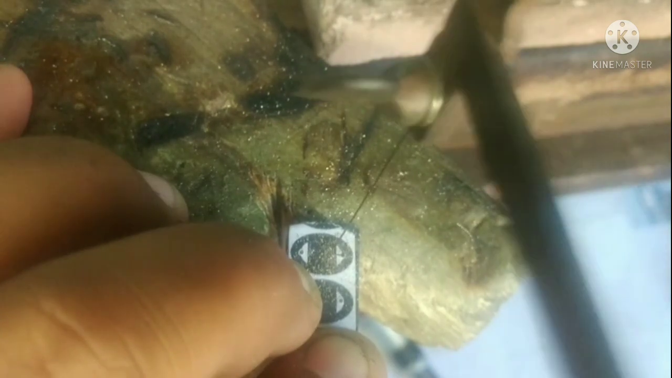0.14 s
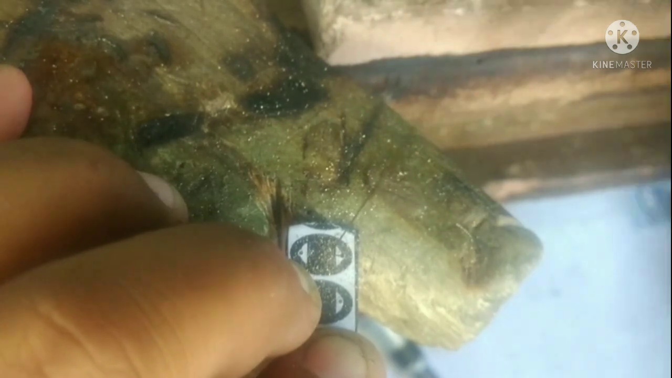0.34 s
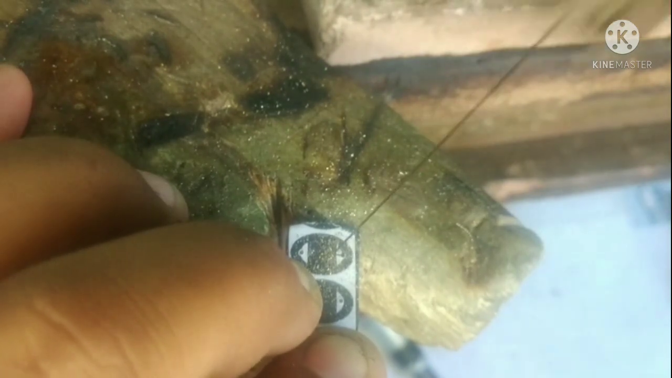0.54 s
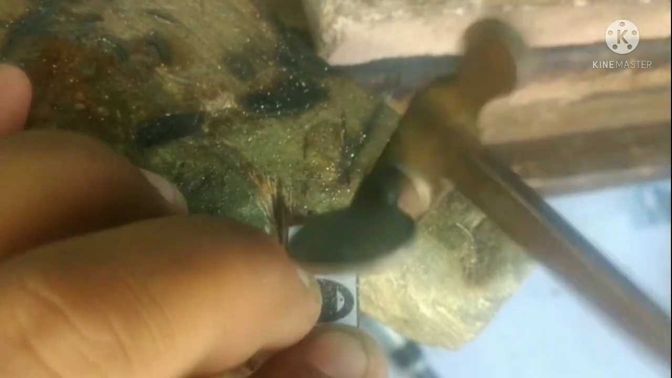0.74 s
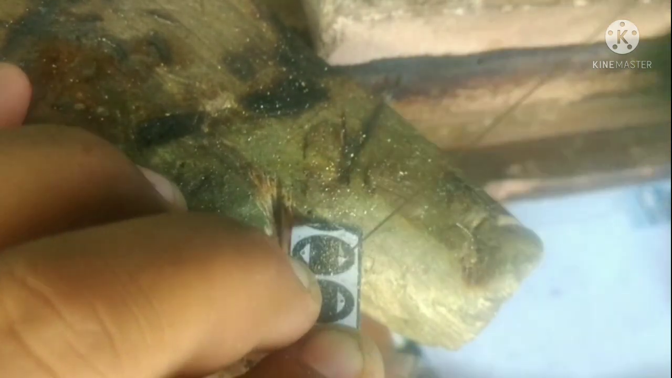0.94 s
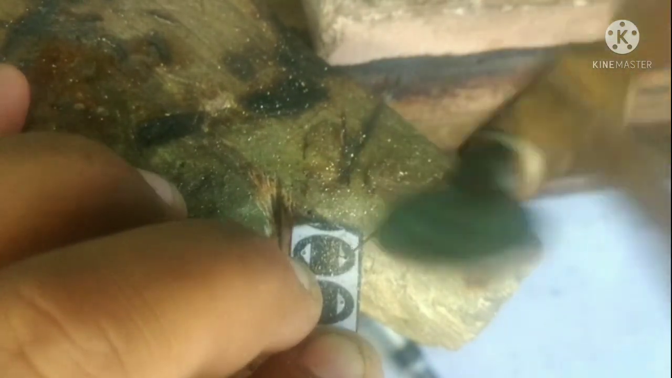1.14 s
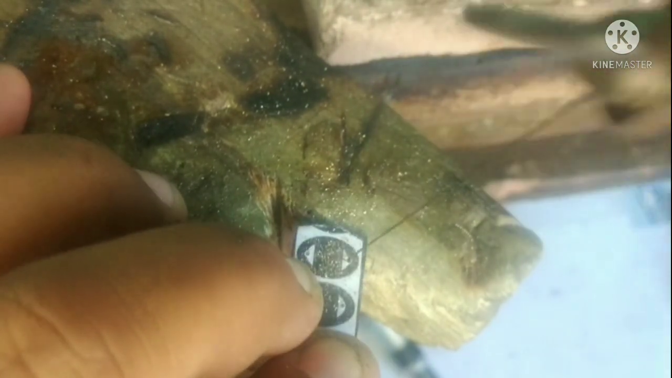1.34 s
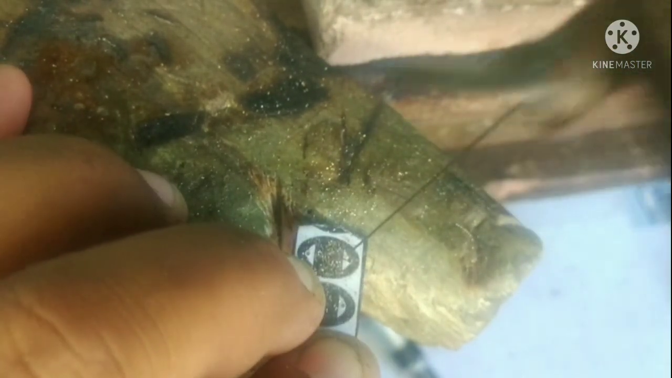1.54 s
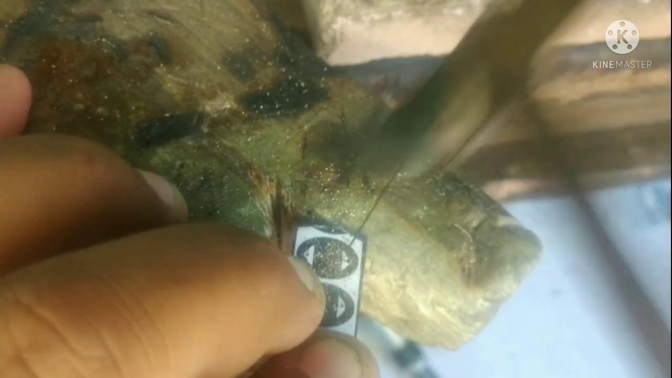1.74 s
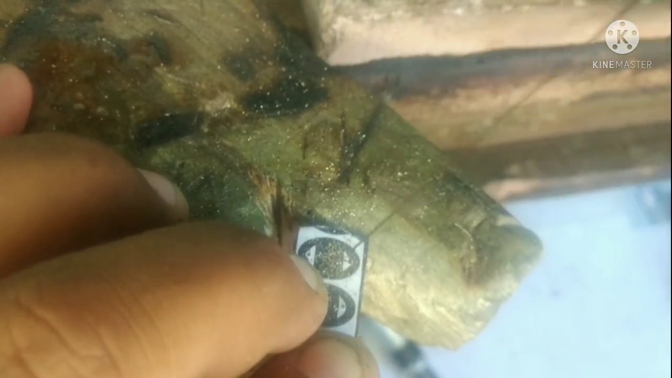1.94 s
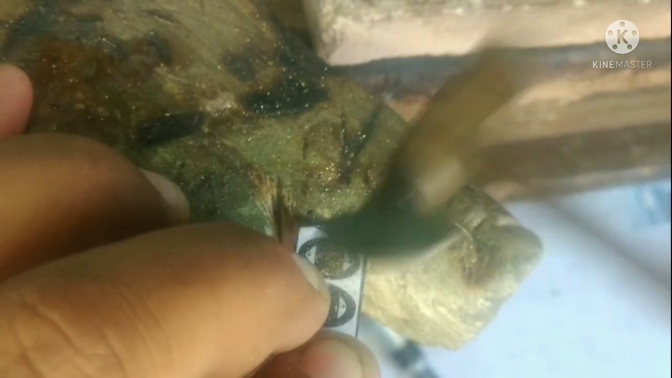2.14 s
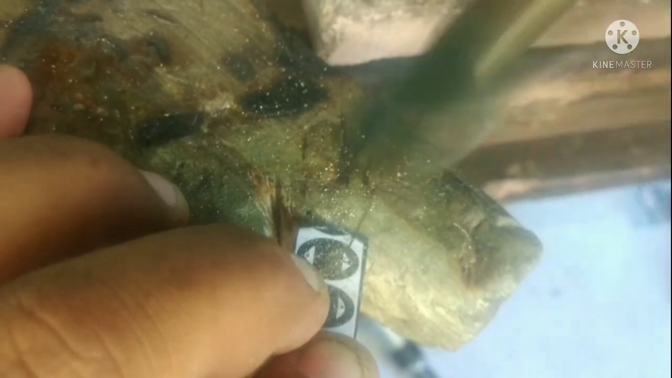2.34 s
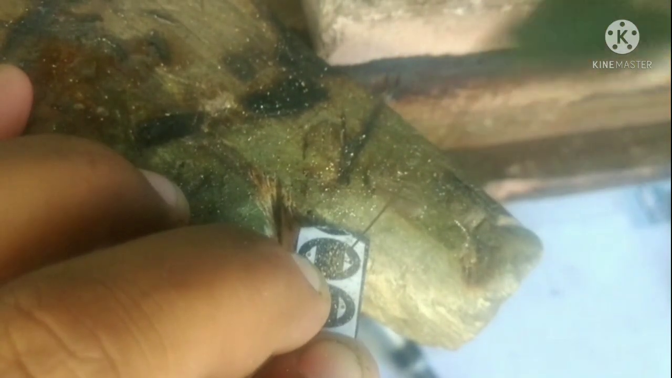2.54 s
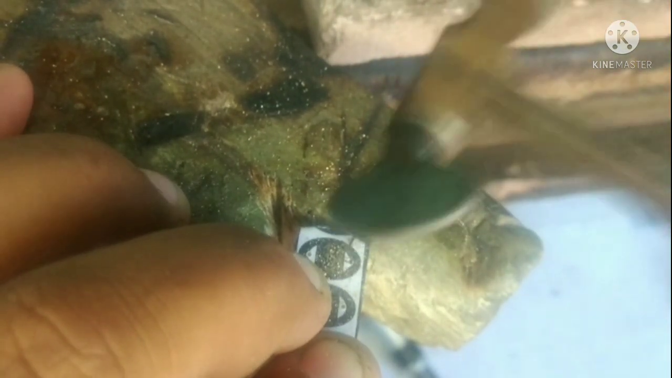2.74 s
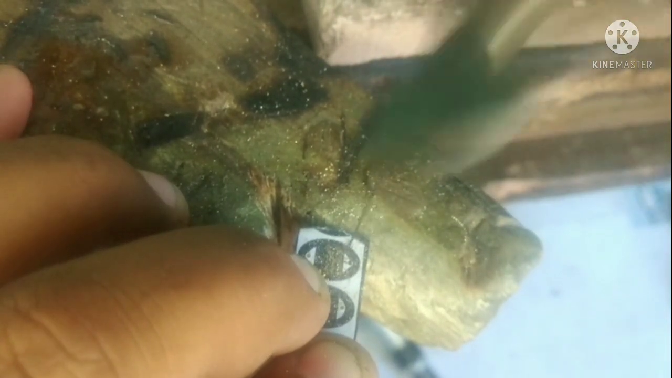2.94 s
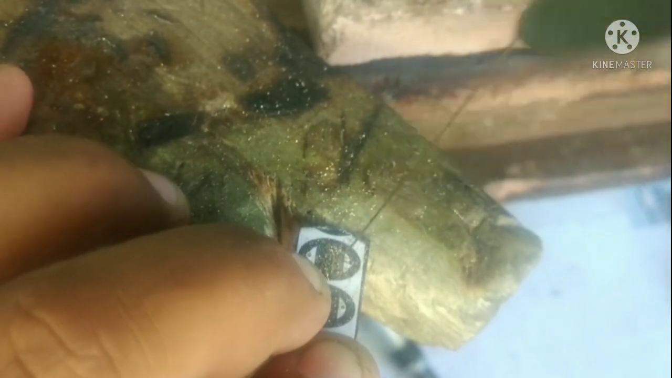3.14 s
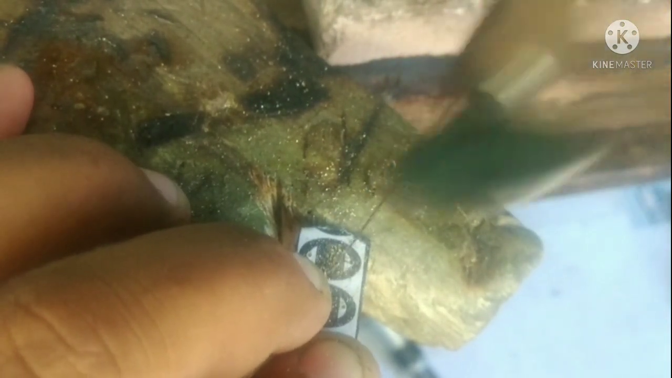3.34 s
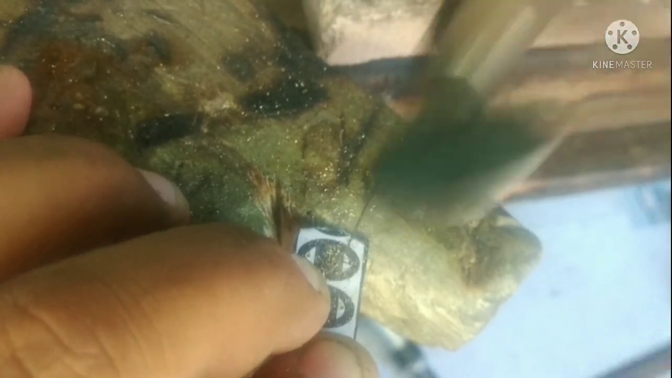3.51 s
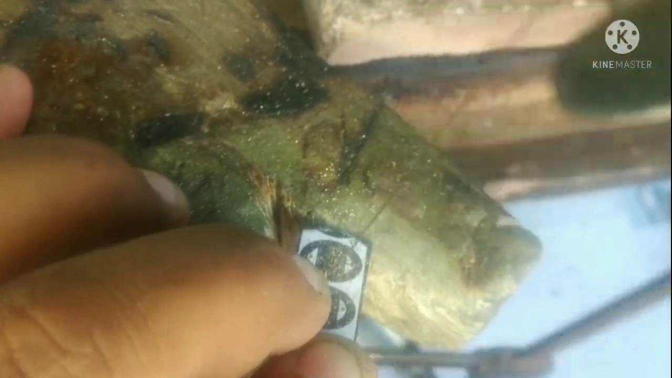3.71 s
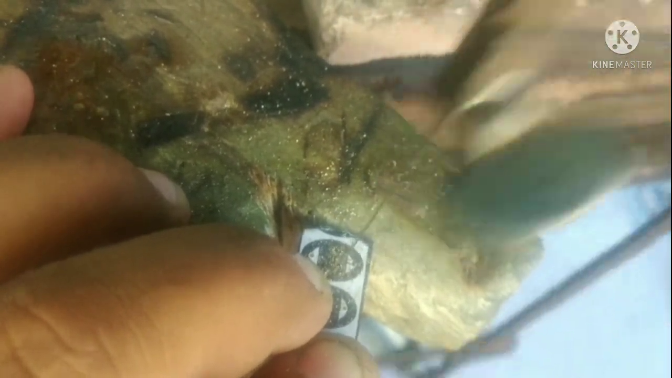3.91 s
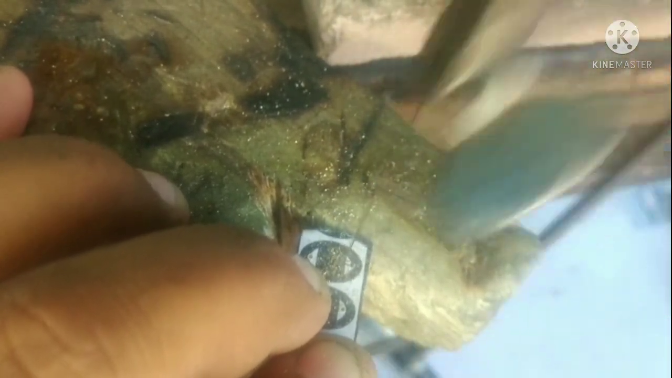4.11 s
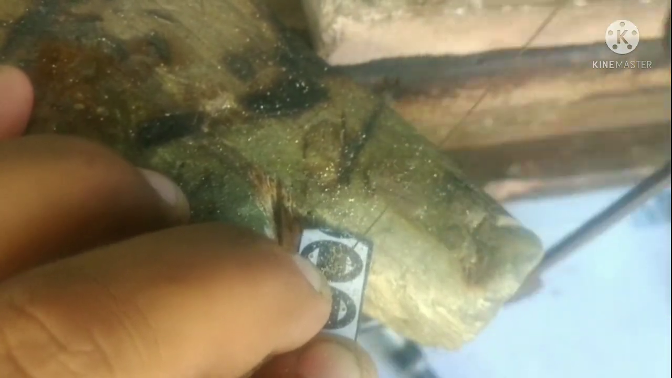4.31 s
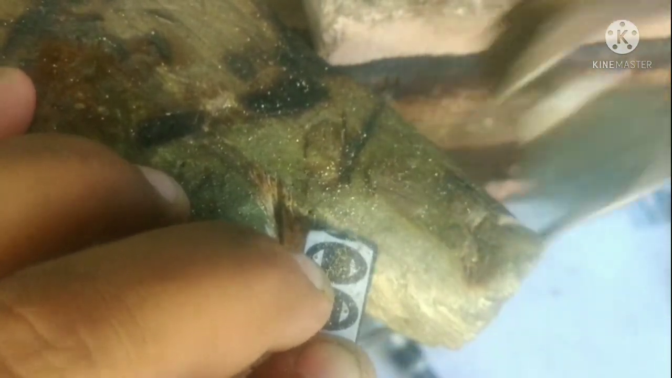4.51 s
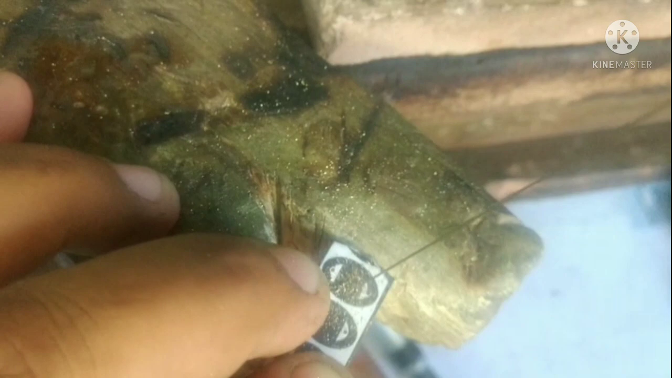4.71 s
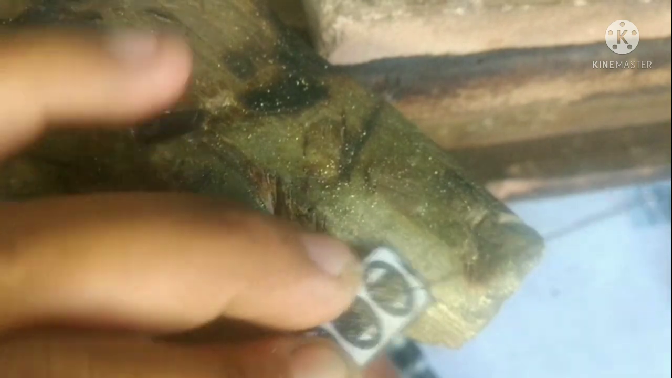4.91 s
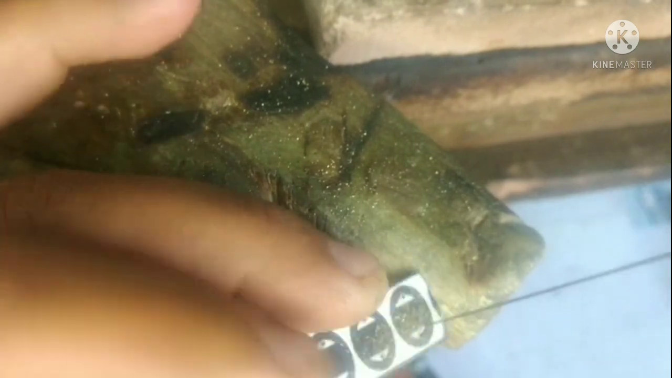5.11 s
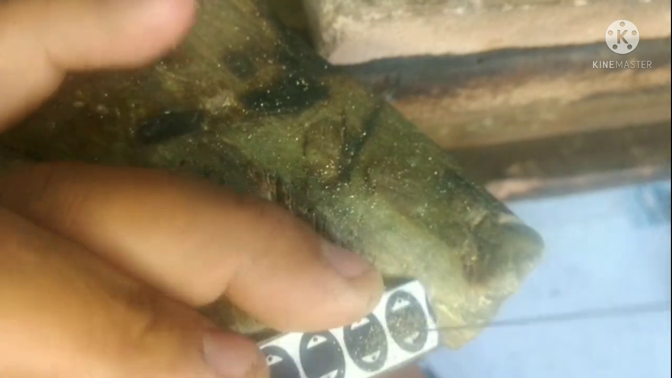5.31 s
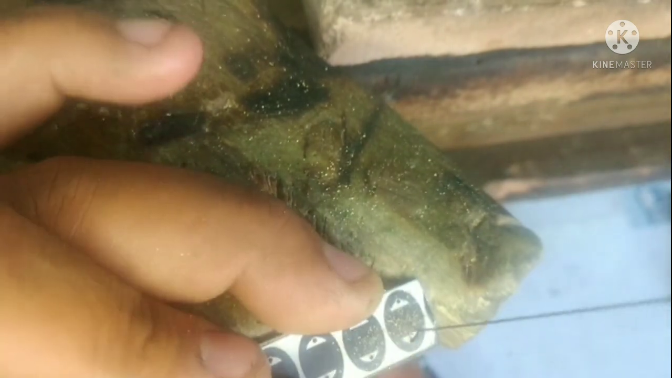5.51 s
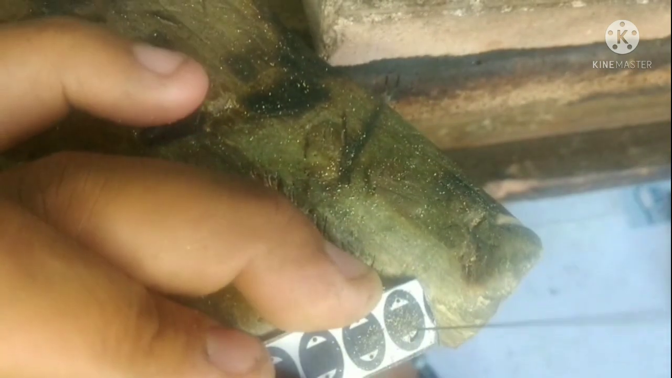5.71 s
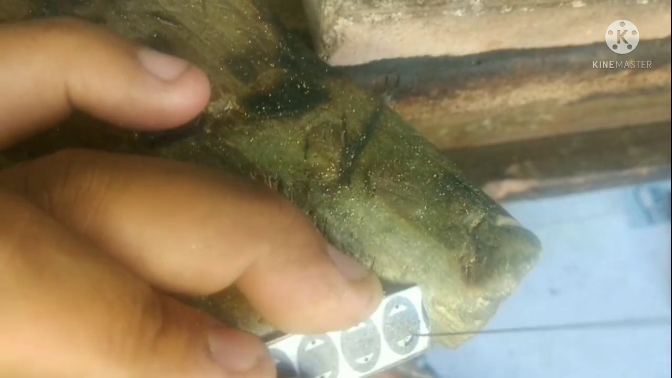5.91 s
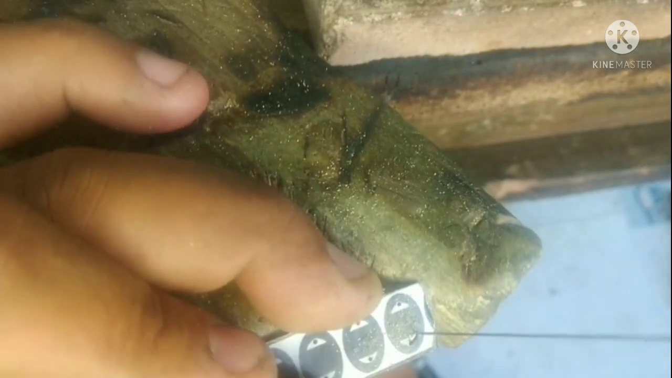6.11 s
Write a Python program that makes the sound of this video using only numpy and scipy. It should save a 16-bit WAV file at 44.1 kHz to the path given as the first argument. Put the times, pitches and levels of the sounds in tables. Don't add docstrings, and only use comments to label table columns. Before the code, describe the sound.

A small, quiet room with faint hiss, heard very close. The tail of a saw stroke opens it, then a short gritty rasp through thin metal at 0.2 s with a soft return. From 0.5 to 1.4 s the idle blade rubs and catches lightly; light touches near 0.75 s precede a hard, bright, ringing metal knock at 1.1 s. Cutting resumes at 1.55 s and settles into short buzzing strokes roughly every 0.3 s until about 4.4 s, with quieter return scrapes, fleeting blade squeaks and a low bench boom that grows heavier after 2.7 s. A dull thump lands at 2.6 s. After 4.6 s sawing stops: a brief shift, a tiny high tink at 4.9 s, a cluster of dry ticks around 5.25 s, a faint low hum as the piece slides at 5.5 s, then scuffs and a small woody knock at 5.9 s with soft final bumps.

```python
import sys
import numpy as np
from scipy import signal
from scipy.fft import rfft, irfft, next_fast_len
from scipy.io import wavfile
from scipy.ndimage import uniform_filter1d

SR = 44100
rng = np.random.default_rng(int(sys.argv[2]) if len(sys.argv) > 2 else 0)


def store_pcm(level_fs):
    pcm = np.round(np.clip(level_fs, -1, 1) * 32767).astype(np.int16)
    wavfile.write(sys.argv[1], SR, np.atleast_2d(pcm).T)


def boost(x):
    u = np.asarray(x, float) / 20
    return 10 ** u


N = 271656
SIZE = next_fast_len(N + SR)
HZ = np.arange(SIZE // 2 + 1) * SR / SIZE + 1e-3
TIME = np.arange(N) / SR


def saw():
    # t/s, peak level/dB
    grab_list = [(0.1832, -21), (0.4989, -32), (0.513, -35), (0.6104, -31.5), (0.6653, -36), (0.6863, -33),
                 (0.7244, -31.5), (0.7434, -33), (0.9555, -41.5), (0.968, -36.5), (1.277, -25),
                 (1.414, -47), (1.452, -35), (1.5609, -40), (1.861, -46), (1.883, -29.5), (1.905, -33.5),
                 (2.196, -17), (2.261, -13.5), (2.49, -24), (2.562, -17), (2.7875, -20), (3.079, -13),
                 (3.51, -32), (3.626, -20), (3.935, -26), (4.224, -31), (4.6, -33), (5.846, -43.5)]
    # from t/s, to t/s
    sliding = [
        (4.595, 4.77),
        (5.3, 6.2),
    ]
    rasp, frame_drive, sizzle, bench_drive = effort()
    grabs = sum(boost(db - 13.5) * (TIME >= s) * np.exp(-np.abs(TIME - s) / 0.0076) for s, db in grab_list)
    loose = uniform_filter1d(sum(1. * (TIME > a) * (TIME < b) for a, b in sliding), 400)
    held = 1 - loose
    bite = teeth(5000, spread_db=2.0, patchy_db=1.0, patch_hz=136.2)
    grit = teeth(10000, spread_db=1.0, patchy_db=0.13, patch_hz=64.8)
    jolts = teeth(500, spread_db=1.0, patchy_db=-1.5, patch_hz=30.13)
    out = boost(7.5) * sheet(bite * (rasp * held + grabs))
    out = out + boost(7.5) * frame(bite * frame_drive)
    out = out + boost(5.5) * fine_sheet((grit + 0.62 * bite) * (sizzle * held + .04 * grabs))
    out = out + scuff(grit * rasp * loose, grit * sizzle * loose)
    return out + boost(0.76) * bench(jolts * bench_drive)


def effort():
    # t/s, length/s, rasp level/dB, frame/dB re rasp, bench/dB re rasp
    cuts = [(-.06, 0.063, -32, -7.5, 1), (.184, 0.11, -33.5, -4.5, -4), (1.556, 0.079, -31, -5.5, -5),
            (1.862, 0.11, -30.5, -6, -8.5), (2.192, 0.076, -29.5, -2, -1.5), (2.488, 0.088, -30, -1, -1),
            (2.787, 0.078, -32, -4, -0.5), (3.072, 0.067, -33, -2, -0.5), (3.33, 0.096, -34, -1, -3.5),
            (3.625, 0.092, -37, -0.5, 7), (3.934, 0.088, -32.5, -2, 4), (4.218, 0.089, -35.5, -4, -2.5)]
    # t/s, length/s, rasp
    # level/dB, frame/dB re rasp, bench/dB re rasp
    returns = [(.045, 0.15, -42, -17, -11), (.32, 0.16, -46, -12, -12), (1.69, 0.17, -41.5, -12.5, -6),
               (2.03, 0.19, -38.5, -6, -6.5), (2.345, 0.15, -38.5, -9, -7), (2.64, 0.12, -37, -6, 2.5),
               (2.92, 0.17, -39, -4.5, 3), (3.2, 0.15, -42, -6, 9.5), (3.47, 0.2, -44, -3.5, 7.5),
               (3.78, 0.12, -40, -5, 6), (4.09, 0.12, -39.5, -5.5, -8), (4.35, 0.18, -43.5, -3, -24),
               (5.955, 0.14, -63, 11, 0), (2.095, 0.052, -35.5, -8.5, -20), (2.4, 0.078, -41, -3.5, -14)]
    # t/s, length/s, rasp level/dB, sizzle/dB re rasp, bench/dB re rasp
    rubs = [(.48, 0.14, -51, -17, -30), (.604, 0.048, -58, -12, -14.5), (.68, 0.071, -47.5, -18, -18),
            (.724, 0.05, -50, -6, -10), (.79, 0.059, -45.5, -9, -8), (.954, 0.044, -50.5, -10.5, -26),
            (1.11, 0.13, -45.5, -14.5, -9), (1.22, 0.11, -41, -16, -20), (1.29, 0.1, -55.5, -13, 12),
            (1.39, 0.13, -45.5, -16, -5), (4.5, 0.15, -67, -31, -27), (4.594, 0.094, -50, 1, -29),
            (4.77, 0.076, -58.5, -18, -8.5), (4.882, 0.07, -73.5, -5.5, 6), (5.53, 0.13, -84.5, -8, 19.5),
            (5.838, 0.091, -49, -4, -17), (5.965, 0.15, -54, -3, 7)]
    # peak at share of length, onset level/dB, end level/dB, release/(dB/s), trim/dB
    cut_shape = [
        (0.51, -9.5, -7, 301.5, 2),
        (1, -6, -4, 156.5, 3.5),
        (0.61, -9.5, -5.5, 167.5, -15.5),
        (1, -5.5, 0, 107, 1.5),
    ]
    return_shape = [
        (0.46, -5, -13.5, 140, 0),
        (0.25, -2.5, -2.5, 840, 2.5),
        (0.42, -9.5, -15, 190, -12),
        (0.18, 0, 1, 680, -9.5),
    ]
    rub_shape = [
        (0.21, -14.5, -7.5, 210, -2),
        (0.34183, 2.5, -3.5, 200, -19.5),
        (0.22, -17.5, -7, 260, 1.5),
        (0.18, -8.5, -13.5, 260, 4),
    ]
    power = 0
    for rows, shapes, own in ((cuts, cut_shape, 1), (returns, return_shape, 1), (rubs, rub_shape, 0)):
        start, length, db, extra_db, bench_db = np.transpose(rows)
        levels = db, db + own * extra_db, db + (1 - own) * extra_db, db + bench_db
        power = power + np.array([swell(start, length, *pair) ** 2 for pair in zip(levels, shapes)])
    return np.sqrt(power)


def swell(start, length, db, shape):
    peak_at, onset_db, end_db, release, trim_db = shape
    lead_db, lead_db_per_s, onset_s = -8, 300, 0.0059
    grid_s = np.arange(-.1, N / SR + .01, .001)
    since, length = grid_s - start[:, None], length[:, None]
    top = np.clip(peak_at, .02, .98) * length
    climb = onset_db * (1 - since / top)
    sag = end_db * np.minimum((since - top) / (length - top), 1)
    hump = np.where(since < top, climb, sag)
    hump = boost(db[:, None] + trim_db + hump - release * np.maximum(since - length, 0))
    early = np.minimum(since, 0)
    lead = boost(lead_db + lead_db_per_s * early - onset_db * early / top)
    hump = hump * (lead + (1 - lead) * np.clip(since / onset_s, 0, 1))
    return np.interp(TIME, grid_s, np.sqrt(np.sum(hump ** 2, axis=0)))


def teeth(rate_hz, spread_db, patchy_db, patch_hz):
    chance = rng.random((3, N))
    sign = np.sign(chance[1] - .5)
    size = boost(-spread_db * np.log(chance[2] + 1e-4))
    clicks = (chance[0] < rate_hz / SR) * sign * size
    clicks = clicks * boost(patchy_db * walk(patch_hz))
    return clicks / np.sqrt(np.mean(clicks ** 2))


def sheet(force):
    # f/Hz, width/Hz, level/dB
    sheet_modes = [(2006, 76, 6.5), (2212, 89, 3.5), (2376, 80, 6.5), (2260, 430, -0.5), (2942, 67, 4.5),
                   (2791, 98, -2), (3490, 68, -8), (2575, 100, 4), (3974, 70, -1), (3072, 97, 1)]
    ring = shifting(force, sheet_modes, wander_db=2.5, wander_hz=70, sharp_hz=80)
    return through(ring, 1 / (1 + 1j * HZ / 5000) ** 2 * mode(2600, 2400, 1.3))


def frame(force):
    # f/Hz, width/Hz, level/dB
    frame_modes = [(861.2, 52, 9.5), (1108, 38, -2.5), (1480, 687, -1), (986, 866, -5.5), (1331, 34, -13.5),
                   (2924, 48, -1)]
    ring = shifting(force, frame_modes, wander_db=3, wander_hz=50, sharp_hz=50)
    return through(ring, 1 / (1 + 680 / (1j * HZ)) ** 3)


def fine_sheet(force):
    # f/Hz, width/Hz, level/dB
    sizzle_modes = [(4720, 440, -9), (6576, 420, -2), (8560, 230, -11), (10240, 200, -6.5),
                    (11160, 260, -10), (12530, 430, -3.5), (14420, 250, 0.5), (13420, 430, -13),
                    (14960, 810, -7)]
    return through(force, resonances(sizzle_modes))


def scuff(low_force, high_force):
    # f/Hz, width/Hz, level/dB
    low_modes = [(468, 35, 4), (1393, 200, 10), (2020, 760, 11), (2930, 1200, 7.5), (4300, 630, -5),
                 (2560, 1750, -6)]
    # f/Hz, width/Hz, level/dB
    high_modes = [(6700, 1500, -10), (9630, 2000, -4.5), (11600, 4400, -2.5), (14630, 2400, -1)]
    low = through(low_force, boost(11.0) * resonances(low_modes))
    return low + through(high_force, boost(7.0) * resonances(high_modes))


def bench(force):
    # f/Hz, width/Hz, level/dB
    top_modes = [(211.3, 40, -2.5), (250.5, 44.6, 1.5), (331, 88, -2.5), (470, 297, -15), (167, 34, -11.5)]
    # f/Hz, width/Hz, level/dB
    leg_modes = [(131, 16, -9.5), (96.9, 17, -19), (58.6, 39, -20), (164.5, 12, -13)]
    # t/s, level/dB
    lean = [(0, -13.5), (1.5, -18.5), (2.3, -19), (2.7, -9.5), (3.4, -9.5), (3.7, -9), (4.3, -8),
            (4.6, -16.5), (6.2, -16.5)]
    boom = shifting(force, top_modes, wander_db=3, wander_hz=25, sharp_hz=40)
    load = boost(np.interp(TIME, *np.transpose(lean)))
    return boom + through(force * load, resonances(leg_modes))


def blade():
    # t/s, length/s, from f/Hz, to f/Hz, level/dB
    whistles = [(0.064, 0.041, 5700, 4200, -50), (1.744, 0.034, 3800, 4500, -55),
                (1.718, 0.092, 2500, 1900, -43.5), (2.079, 0.069, 3050, 1700, -43.5),
                (2.087, 0.038, 4100, 5200, -51), (1.3, .025, 4200, 4450, -52),
                (2.347, 0.061, 3400, 5100, -57), (2.386, 0.053, 2650, 2100, -38.5),
                (2.402, 0.042, 6300, 4800, -58), (2.1, 0.04, 2300, 1975, -34),
                (2.95, 0.034, 2700, 3170, -49.5), (2.978, 0.031, 3200, 2570, -44),
                (2.978, 0.026, 3300, 4200, -49.5), (3.242, .05, 3900, 1000, -49),
                (3.26, 0.027, 3680, 4300, -51), (3.552, 0.029, 3170, 4170, -50.5),
                (3.585, .025, 3900, 4500, -61), (3.575, 0.031, 1400, 1700, -41),
                (3.843, 0.05, 3300, 4500, -55), (4.135, .045, 3770, 4870, -55),
                (4.258, .045, 1950, 2320, -60), (4.41, 0.058, 2140, 1600, -39),
                (4.433, 0.074, 950, 820, -51), (4.033, 0.054, 900, 555, -50),
                (2.805, 0.035, 1080, 1190, -38), (3.094, 0.033, 1050, 1138, -42.5),
                (4.25, 0.065, 1050, 1180, -51), (1.4, 0.032, 410, 280, -57), (1.31, 0.087, 380, 200, -54)]
    out = np.zeros(N)
    waver = 1 + .013 * walk(300)
    flutter = boost(2.5 * walk(120))
    for s, length, hz0, hz1, db in whistles:
        at = slice(int(s * SR), int((s + length) * SR))
        u = (TIME[at] - s) / length
        level = boost(db + 9.5) * np.sqrt(np.abs(np.sin(np.pi * u))) * flutter[at]
        cycles = np.cumsum((hz0 + (hz1 - hz0) * u) * waver[at]) / SR
        out[at] += level * np.sin(2 * np.pi * cycles)
    return out


def clamp_knocks():
    # f/Hz, level/dB, t60/s
    modes = [(12440, -6, 0.24), (13380, -10, 0.16), (13450, -7.5, 0.36), (14000, -3, 0.07),
             (13700, -10.5, .4), (14900, -16.5, 0.39), (15600, -8, .31), (14900, -13, .26),
             (17160, -6, .35), (11600, -27, 0.43), (11930, -13, 0.34), (11400, -14.5, 0.2),
             (10250, -28, 0.21)]
    # t/s, peak level/dB, brightness/dB per octave
    hits = [
        (0.7256, -36, 2),
        (0.8075, -28.5, 1),
        (1.1004, -1.5, -0.5),
    ]
    return knocks(hits, modes, trim_db=-6.0, crack_db=-17, crack_s=0.057, beat_hz=197.4, rough=0.6,
                  push_s=0.0005, count=12)


def bow_knocks():
    # f/Hz, level/dB, t60/s
    modes = [(9600, -17, 0.58), (9100, -24, 0.17), (8450, -28, .25), (7350, -20.5, 0.11),
             (4973, -17.5, 0.48), (3760, -14.5, 0.93), (2660, -16.5, 0.34), (2095, -11.5, 1),
             (1868, -4.5, .13), (2375, -14, 1), (1638, -8, 0.08), (1423, -9.5, 0.26), (1210, -28, 0.17),
             (810, -16, 0.81), (609, -30, 0.31)]
    # t/s, peak level/dB, brightness/dB per octave
    hits = [
        (0.7257, -38, 5.5),
        (0.806, -42.5, 3.5),
        (1.1003, -15, -0.5),
    ]
    return knocks(hits, modes, trim_db=0.5, crack_db=-26.5, crack_s=0.03, beat_hz=149.4, rough=0.7,
                  push_s=0.00053, count=10, jangle=0.42)


def piece_knocks():
    # f/Hz, level/dB, t60/s
    modes = [(2360, -8, .15), (2920, -23, .14), (3920, -18, 0.36), (6440, -25, .1), (7530, -27, .15),
             (8300, -24, .1), (9930, -20, .11), (12240, -11, 0.24), (13300, 1, .11), (14200, -8, .2),
             (14830, 2, 0.2), (15250, -5, .08)]
    # t/s, peak level/dB, brightness/dB per octave
    hits = [
        (4.8826, -43.5, 0),
    ]
    return knocks(hits, modes, trim_db=0.0, crack_db=-21.5, crack_s=0.0067, beat_hz=109, rough=0.49,
                  push_s=0.00036)


def turned_knocks():
    # f/Hz, level/dB, t60/s
    modes = [(4872, -16, .1), (6450, -18, .06), (7220, -22, .15), (8300, -11, 0.25), (9399, -20, .1),
             (10200, -16, 0.13), (10900, -18, .09), (12350, -10, 0.17), (14300, -10, .17),
             (14950, -0.5, .13), (15500, -16, .1)]
    # t/s, peak level/dB, brightness/dB per octave
    hits = [
        (5.2233, -50.5, 0),
    ]
    return knocks(hits, modes, trim_db=1.5, crack_db=-21, crack_s=0.005, beat_hz=80, rough=0.47,
                  push_s=0.00078)


def peg_knocks():
    # f/Hz, level/dB, t60/s
    modes = [(984, -9, 0.25), (1162, -8, 0.12), (1920, -9.5, 0.32), (2910, -5.5, 0.13), (4054, -4, 0.025),
             (4240, 3, 0.019), (1660, -6, 0.057), (2290, -6.5, 0.038)]
    # t/s, peak level/dB, brightness/dB per octave
    hits = [
        (0.727, -71, 6),
        (0.806, -42.5, 6.1),
        (5.941, -26.5, 1.5),
    ]
    return knocks(hits, modes, trim_db=3.5, crack_db=-20.5, crack_s=0.005, beat_hz=126, rough=0.2,
                  push_s=0.00063)


def ticks():
    # f/Hz, level/dB, t60/s
    modes = [(890, 0, 0.024), (1154, -3, 0.047), (1620, 0, 0.03), (2350, -16, 0.037), (4030, -2, 0.032),
             (2872, -10, 0.026), (4830, -12, 0.026), (2030, -10, 0.024)]
    # t/s, peak level/dB, brightness/dB per octave
    hits = [
        (4.788, -62, -1),
        (4.829, -51, -4),
        (4.919, -57, 1),
        (5.243, -58, 16),
        (5.255, -62, 3),
        (5.266, -53.5, 2),
        (5.274, -48.5, -2.5),
        (5.288, -66, 2),
        (5.304, -60, -6),
    ]
    return knocks(hits, modes, trim_db=-0.5, crack_db=-40, crack_s=.004, beat_hz=61.5, rough=0.59,
                  push_s=0.0014, jangle=0.45)


def thumps():
    # f/Hz, level/dB, t60/s
    modes = [(338.3, 3.5, 0.22), (227, -6.5, 0.24), (426, 4, 0.061), (132, -25.5, 0.16)]
    # t/s, peak level/dB, brightness/dB per octave
    hits = [
        (1.283, -24.5, 0.00041),
        (1.949, -23.5, 0.013),
        (2.574, -13, 0),
        (2.627, -29.5, 0),
        (5.992, -46, 0),
        (6.015, -33.5, 0),
    ]
    return knocks(hits, modes, trim_db=-8.5, crack_db=-61.5, crack_s=0.0029, beat_hz=27, rough=0.17,
                  push_s=0.0025)


def knocks(hits, modes, trim_db, crack_db, crack_s, beat_hz, rough, push_s, count=7, jangle=0):
    out, t = np.zeros(N + SR), np.arange(SR // 3) / SR
    hz, db, t60 = (c[:, None] for c in np.transpose(modes))
    for s, peak_db, bright_db in hits:
        weight = boost(db + bright_db * np.log2(hz / np.median(hz)) - 60 * t / t60)
        shape = (count, len(hz), 1)
        beside = hz * t + beat_hz * rng.laplace(size=shape) * t + rng.random(size=shape)
        main = hz * t + rng.random(hz.shape)
        neighbours = np.sin(2 * np.pi * beside).sum(axis=0)
        ring = np.sum(weight * (np.sin(2 * np.pi * main) + rough * neighbours), axis=0)
        ring = ring * (1 - jangle + jangle * walk(500)[:len(t)])
        crack = np.diff(rng.standard_normal(len(t) + 1)) * np.exp(-t / crack_s)
        push = (1 - np.exp(-(t / push_s) ** 2)) * np.clip((t[-1] - t) / 0.13, 0, 1)
        push = push * (1 + 1.82 * np.exp(-t / 0.011))
        blow = ring / np.abs(ring).max() + boost(crack_db) * crack
        out[int(s * SR):][:len(t)] += boost(peak_db + trim_db) * push * blow
    return out[:N]


def bench_hum():
    # t/s, length/s, level/dB
    hums = [
        (0.643, 0.14, -53.5),
        (0.783, 0.018, -44),
        (1.118, 0.12, -47.5),
        (1.207, 0.12, -54),
        (4.774, 0.048, -52.5),
        (4.905, 0.053, -55.5),
        (5.38, 0.022, -66),
        (5.541, 0.078, -47),
        (5.999, 0.04, -47),
    ]
    # peak at share of length, onset level/dB, end level/dB, release/(dB/s), trim/dB
    hum_shape = (0.5, -9.5, -1.5, 319, 0.5)
    hum_hz, width_hz = 221, 5
    level = uniform_filter1d(swell(*np.transpose(hums), hum_shape), 300)
    sway_hz = hum_hz + width_hz * walk(25)
    return boost(1.5) * level * boost(1.9 * walk(30)) * np.sin(2 * np.pi * np.cumsum(sway_hz) / SR)


def at_ports(dry):
    # f/Hz, loss/dB
    shade_loss = [(60, 6), (200, 3), (380, 6.5), (700, 6), (1290, 7), (1800, 11.5), (2380, 17),
                  (4400, 14.5), (6500, 9.5), (8120, 30), (15000, 40)]
    room_t60_s, room_db, far_room_db, lag_s = 0.36, -8, 0, 0.00023
    t = TIME[:SR // 2]
    tail = rng.standard_normal((2, len(t))) * boost(-60 * t / room_t60_s) * (t > .003)
    echoes = rfft(tail / np.sqrt(np.sum(tail[0] ** 2)), SIZE)
    apart = np.clip(HZ / 600, 0, 1)
    echoes = np.array([echoes[0], apart * echoes[1] + np.sqrt(1 - apart ** 2) * echoes[0]])
    flat = np.ones(len(HZ))
    direct = np.array([flat, np.exp(-2j * np.pi * HZ * lag_s)])
    shade = np.array([flat, 1 / on_log_axis(shade_loss)])
    return through(dry, shade * (direct + boost(np.array([[room_db], [far_room_db]])) * echoes))


def quiet_room():
    # f/Hz, level/dB per Hz
    quiet = [(25, -12), (65, -4), (90, -8), (125, 0.5), (170, -24), (225, -3), (300, -12), (1000, -21),
             (2000, -29.5), (4000, -36), (15500, -54.5)]
    # f/Hz, level/dB
    quiet_tilt = [(50, -4.5), (150, 5), (250, 0.5), (1000, 4), (2500, 8), (5000, 8)]
    quiet_db = -75
    tilt = np.sqrt(on_log_axis(quiet_tilt))
    hiss = through(rng.standard_normal((2, N)), on_log_axis(quiet) * np.array([tilt, 1 / tilt]))
    return hiss * boost(quiet_db + 3.0) / np.sqrt(np.mean(hiss ** 2))


def shifting(force, table, wander_db, wander_hz, sharp_hz):
    total = np.sqrt(sum(np.mean(np.abs(mode(*row)) ** 2) for row in table))
    out = 0
    for k, row in enumerate(table):
        width_hz = row[1]
        drive = boost(wander_db * min(sharp_hz / width_hz, 1) * walk(wander_hz))
        out = out + (-1) ** k * through(force * drive, mode(*row))
    return out / total


def resonances(table):
    h = sum((-1) ** k * mode(*row) for k, row in enumerate(table))
    return h / np.sqrt(np.mean(np.abs(h) ** 2))


def mode(hz, width_hz, db):
    return boost(db) * 1j * width_hz * HZ / (hz ** 2 - HZ ** 2 + 1j * width_hz * HZ)


def through(x, h):
    return irfft(rfft(x, SIZE) * h, SIZE)[..., :N]


def on_log_axis(table):
    hz, db = np.transpose(table)
    return boost(np.interp(np.log(HZ), np.log(hz), db))


def walk(rate_hz):
    k = max(int(SR / rate_hz), 1)
    return 1.68 * uniform_filter1d(np.repeat(rng.standard_normal(N // k + 1), k), k)[:N]


def scene():
    dry = saw() + blade()
    dry = dry + clamp_knocks() + bow_knocks() + piece_knocks() + turned_knocks()
    dry = dry + peg_knocks() + ticks() + thumps()
    dry = through(dry, 1 / (1 + 45 / (1j * HZ)) ** 2)
    return at_ports(dry) + bench_hum()


def gate_treble(x):
    gate_db, gate_slope = -51.5, .6
    spec = signal.stft(x, nperseg=2048)[2]
    bands = np.arange(1025) // 16
    power = np.add.reduceat(np.abs(spec) ** 2, np.arange(0, 1025, 16), axis=1)
    power = uniform_filter1d(power, size=3, axis=2)
    weak = power < boost(2 * gate_db) * power.max(axis=(0, 1)) ** gate_slope
    weak[:, :12] = False
    return signal.istft(spec * ~weak[:, bands], nperseg=2048)[1][:, :N]


def band_limit(x):
    return signal.sosfilt(signal.butter(12, 16810, fs=SR, output="sos"), x)


def record(dry):
    heard = gate_treble(np.tanh(dry / 1.6) * 1.6)
    heard = heard + quiet_room()
    top_cut = signal.ellip(10, .3, 60, 15700, fs=SR, output="sos")
    return band_limit(signal.sosfilt(top_cut, heard))


dry = scene()
out = record(dry)
store_pcm(out)
```